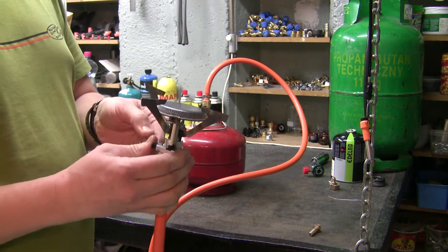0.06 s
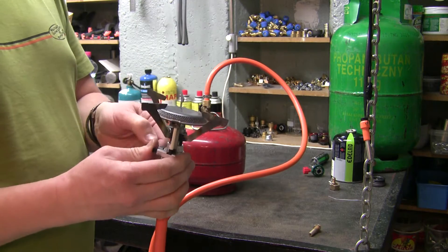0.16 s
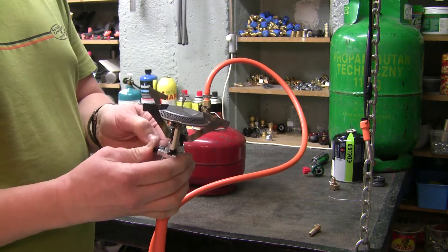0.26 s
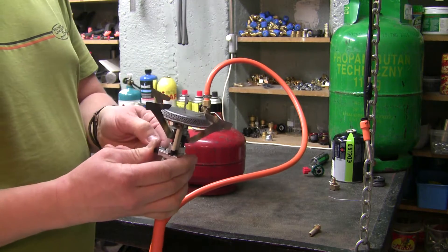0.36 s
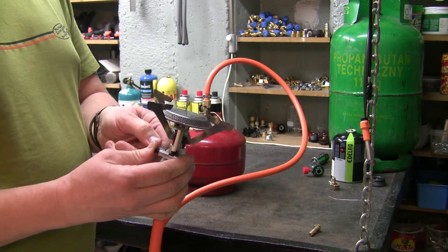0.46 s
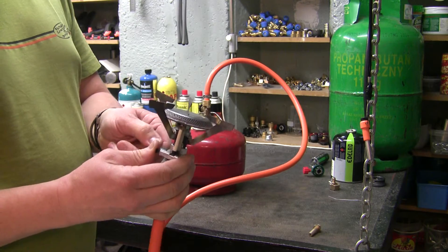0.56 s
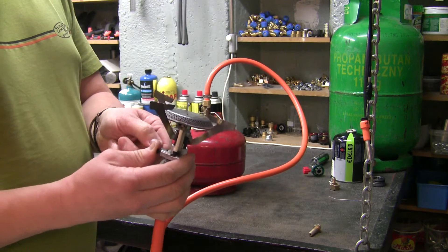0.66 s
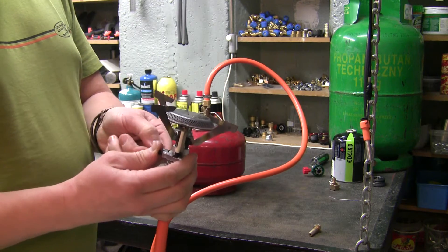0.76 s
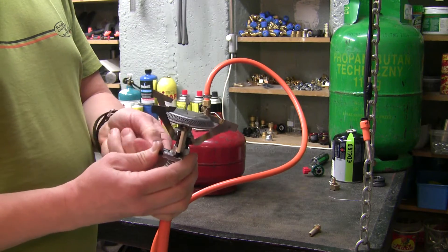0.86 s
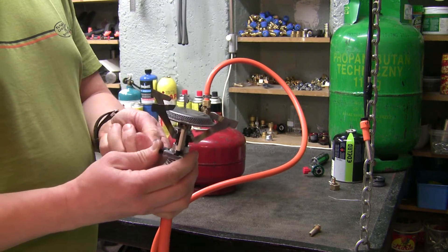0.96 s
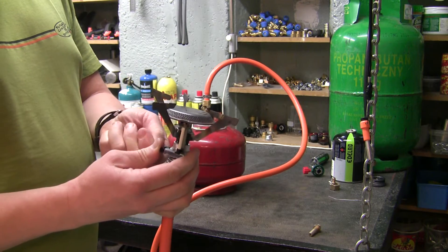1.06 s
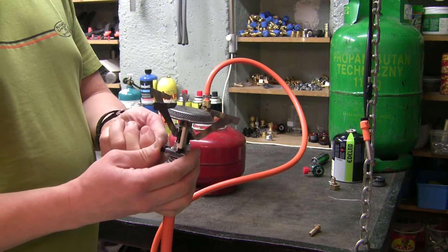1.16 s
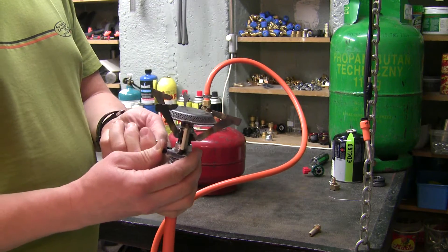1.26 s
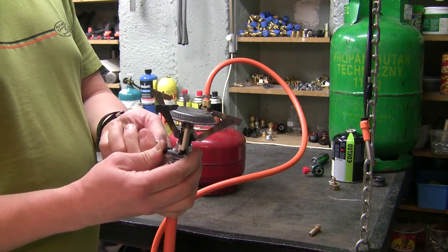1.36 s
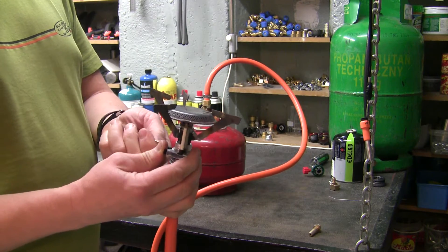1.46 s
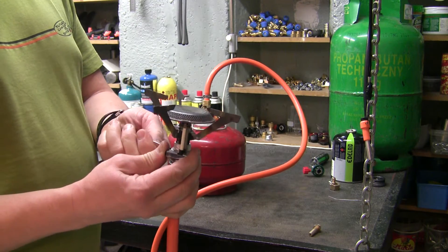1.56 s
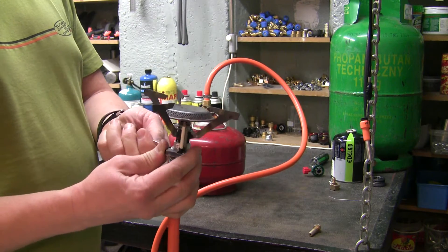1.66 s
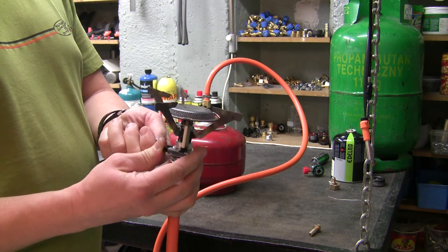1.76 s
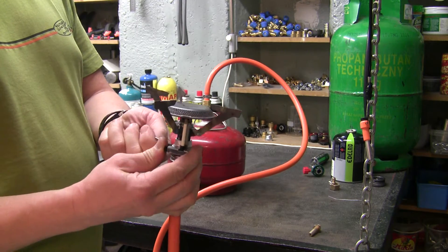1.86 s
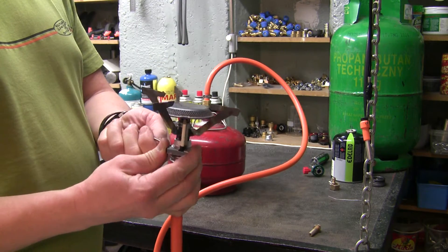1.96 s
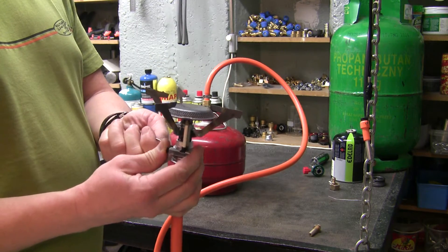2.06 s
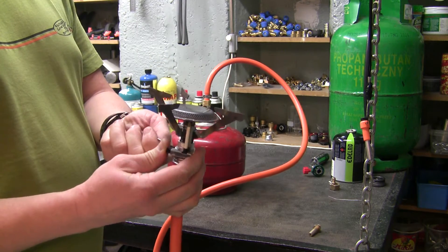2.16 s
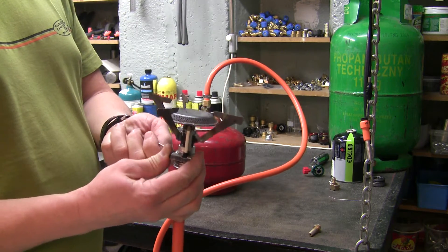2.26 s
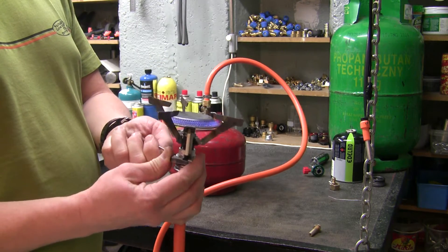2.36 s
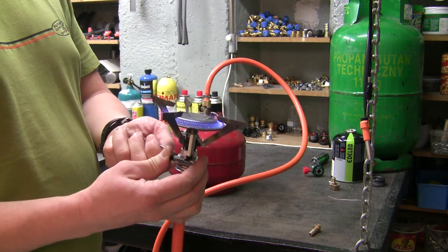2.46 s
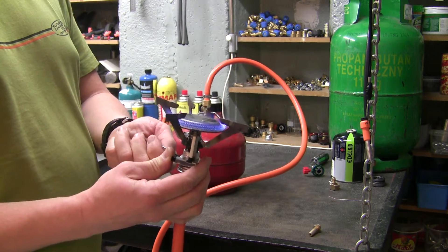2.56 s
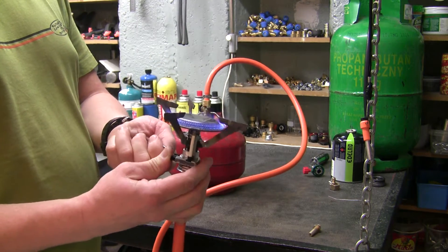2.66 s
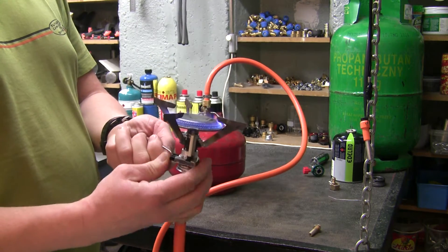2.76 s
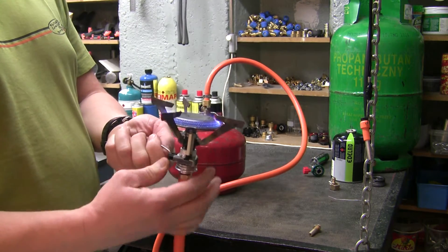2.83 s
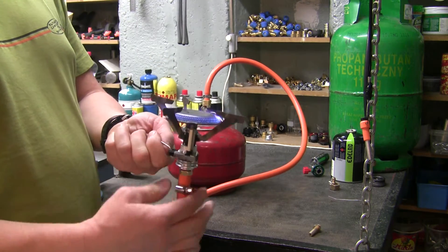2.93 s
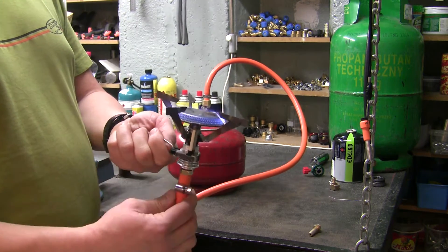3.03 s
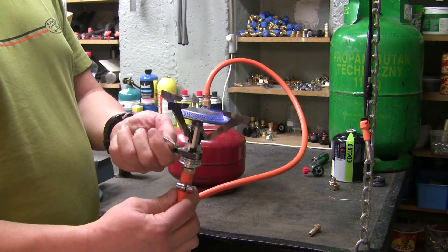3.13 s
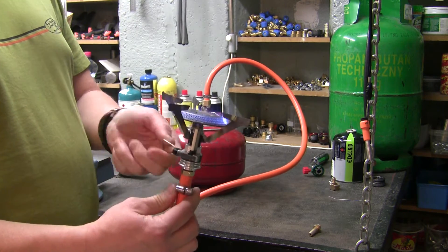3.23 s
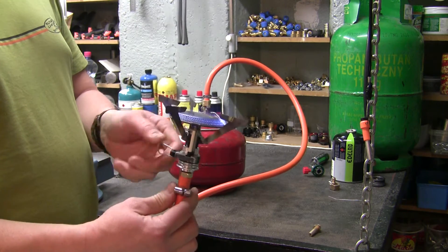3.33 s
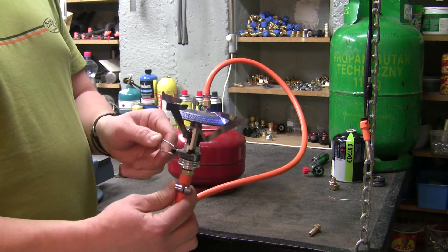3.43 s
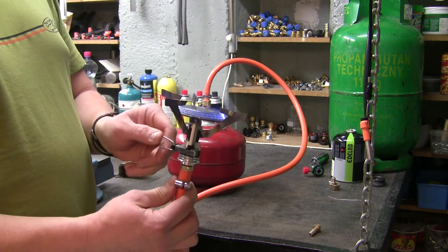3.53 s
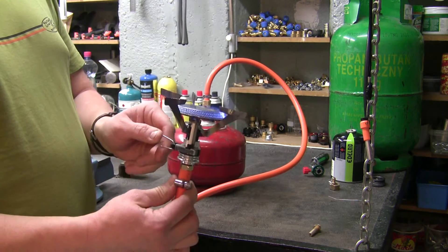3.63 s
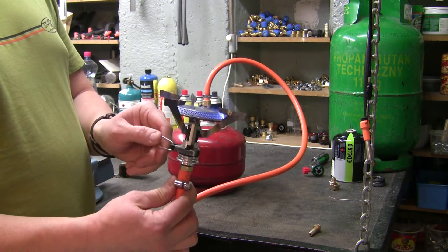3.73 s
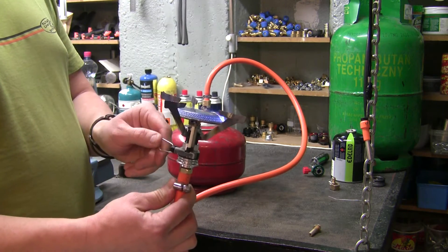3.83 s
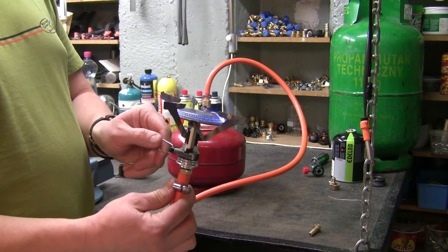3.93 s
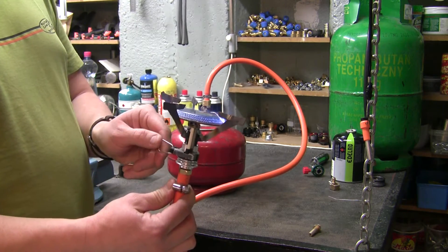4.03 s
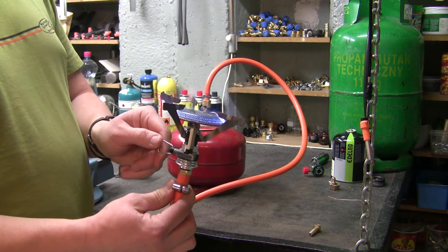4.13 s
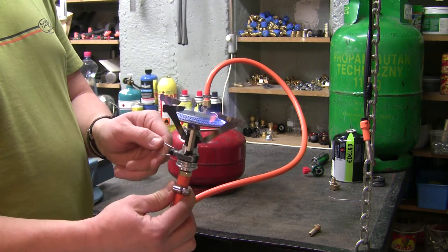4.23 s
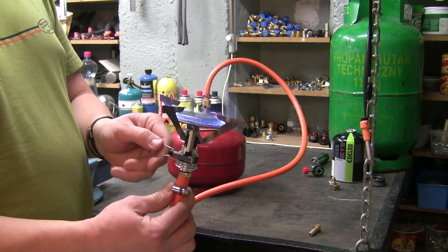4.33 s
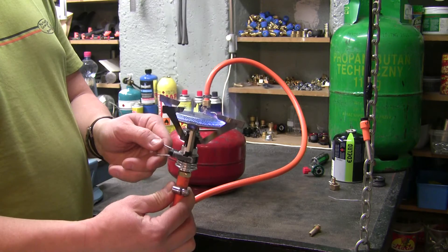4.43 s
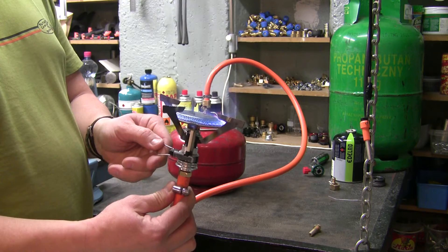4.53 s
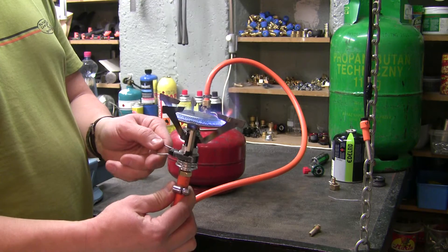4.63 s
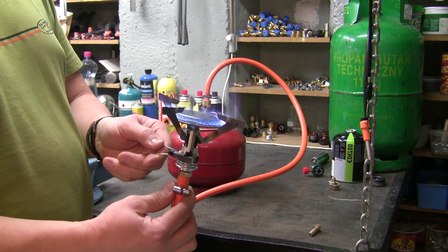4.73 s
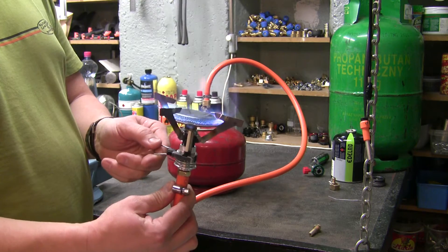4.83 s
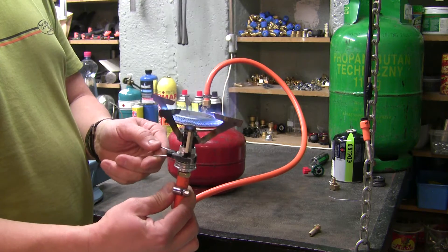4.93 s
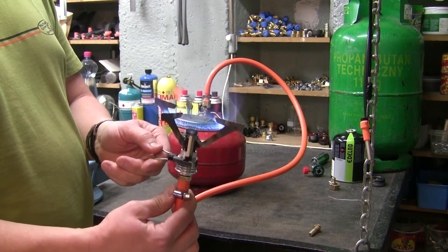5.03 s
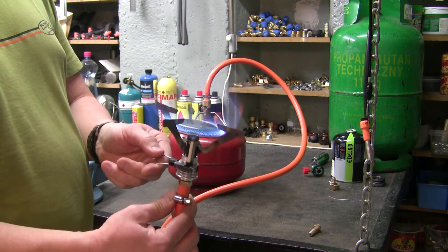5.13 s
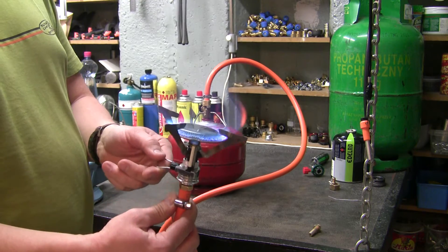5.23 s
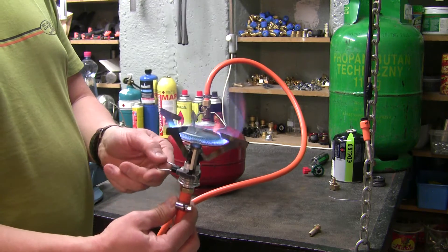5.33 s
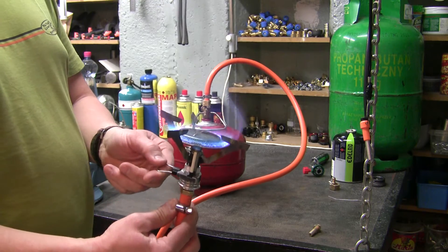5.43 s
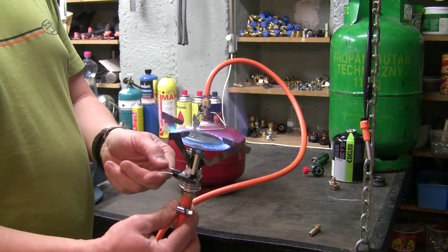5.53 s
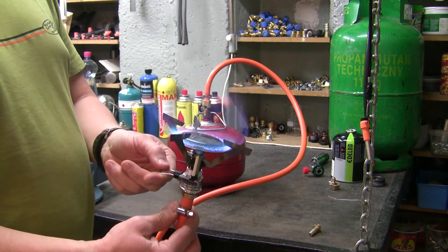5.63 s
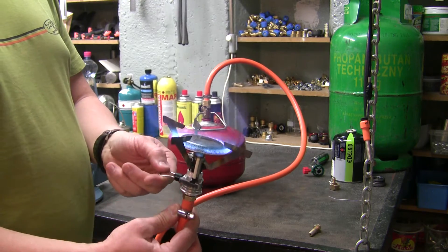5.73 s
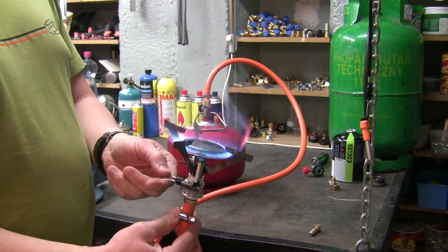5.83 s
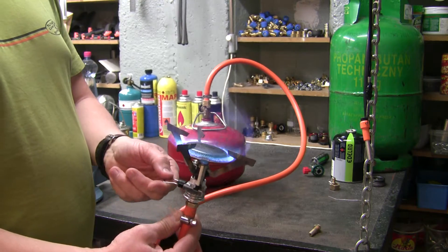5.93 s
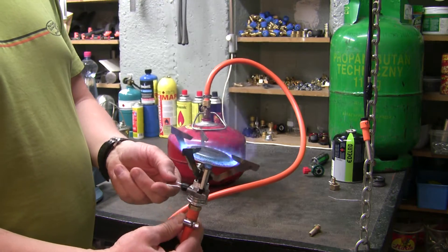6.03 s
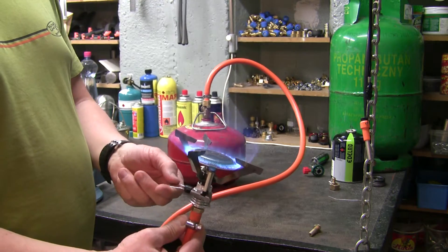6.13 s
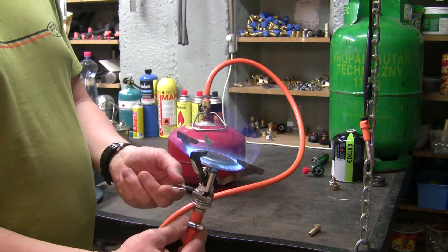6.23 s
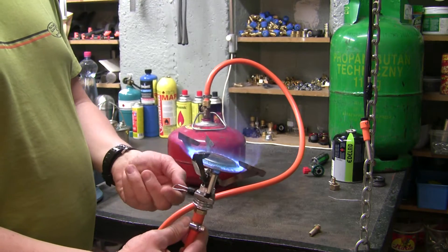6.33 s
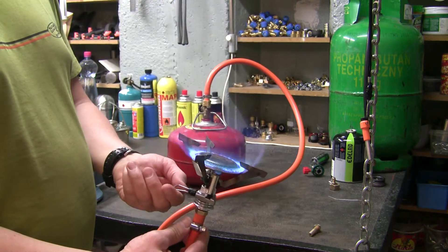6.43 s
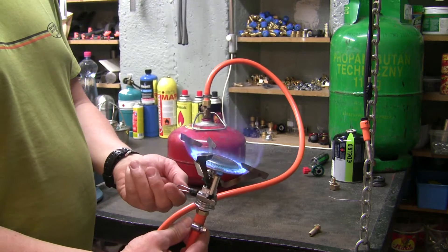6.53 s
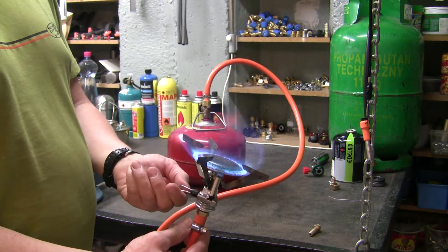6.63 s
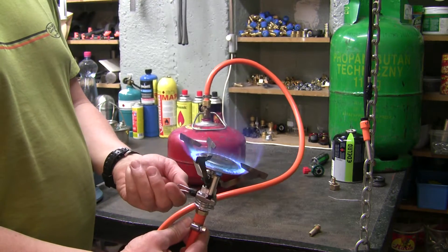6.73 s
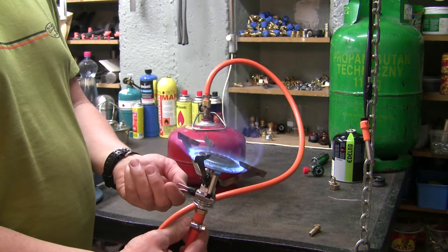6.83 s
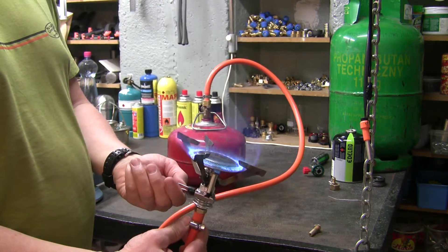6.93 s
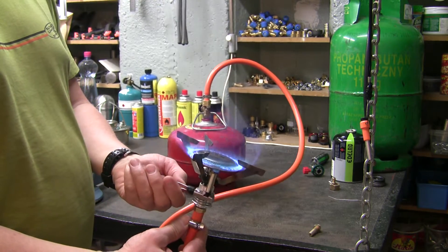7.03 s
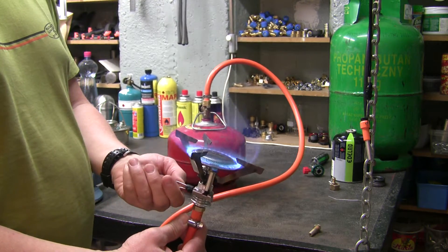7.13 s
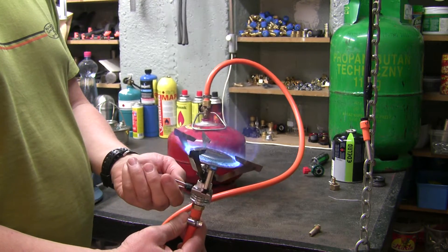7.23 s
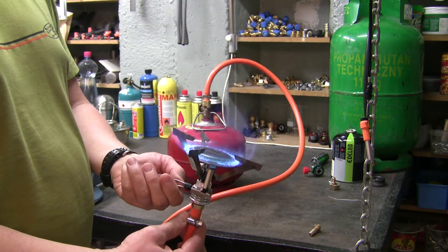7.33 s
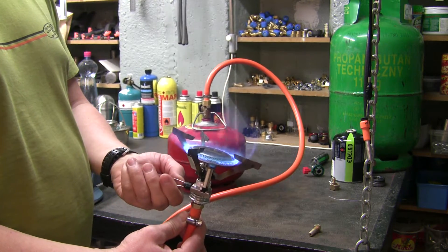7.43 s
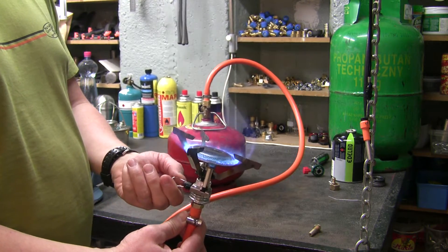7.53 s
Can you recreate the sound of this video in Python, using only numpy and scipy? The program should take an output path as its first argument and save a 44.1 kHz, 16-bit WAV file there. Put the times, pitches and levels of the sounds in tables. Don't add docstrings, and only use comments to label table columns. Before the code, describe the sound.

Close in a hard workshop room, a hand taps the valve wire of a small gas burner and a thin hiss begins. Three very loud, dry igniter snaps follow with tiny mechanical ticks around them. On the third the flame catches as a soft low roar, then the valve opens further and hiss and roar swell to a strong steady blow. One microphone, faint room rumble.

```python
import sys
import numpy as np
from scipy import signal
from scipy.fft import rfft, irfft, next_fast_len
from scipy.io import wavfile
from scipy.ndimage import uniform_filter1d

SR = 44100
rng = np.random.default_rng(int(sys.argv[2]) if len(sys.argv) > 2 else 0)


def natural_amplitude(level_db):
    exponent = np.asarray(level_db, float) / 20
    return 10 ** exponent


def master_out(mix):
    frames = np.transpose(np.atleast_2d(mix))
    ceiling = np.clip(frames, -1, 1)
    pcm = np.round(ceiling * 32767).astype(np.int16)
    wavfile.write(sys.argv[1], SR, pcm)


N = 334542

LIGHT_S = 2.305
SIMMER_DB = -40


def evened(x):
    return x / np.sqrt(np.mean(x ** 2) + 1e-20)


def read(points, hz):
    f, value = np.transpose(points)
    return np.interp(np.log(hz + 1), np.log(f + 1), value)


def frame_axes(size):
    return np.arange(4 * N // size + 6) * size / 4 / SR, np.fft.rfftfreq(size, 1 / SR)[:, None]


def bump(hz, centre_hz, width_hz):
    return 1 / (1 + (2 * (hz - centre_hz) / width_hz) ** 2)


def step(u):
    return .5 + .5 * np.tanh(u / 2)


def noise(gain, patchy_db, size):
    a, b, patch = rng.standard_normal(gain.shape[::-1] + (3,)).T
    patch = uniform_filter1d(patch, size=size // 100, axis=0)
    patch = evened(uniform_filter1d(patch, size=8192 // size + 2, axis=1))
    gain = gain * (frame_axes(size)[1] < 15760)
    gain = gain / np.sqrt((gain ** 2).mean(0)) * natural_amplitude(patchy_db * patch)
    x = signal.istft(gain * (a + 1j * b), nperseg=size, noverlap=3 * size // 4)[1]
    return evened(x[:N])


def wobble(hz):
    low_pass = signal.butter(2, hz, fs=SR, output="sos")
    return evened(signal.sosfilt(low_pass, rng.standard_normal(N)))


# start_s [s], level_db [dB]
VALVE_OPENING = [(.93, -75), (1.0, -64), (1.06, -52), (1.14, -52), (1.2, -42.5), (1.5, -42), (1.7, -44),
                 (1.85, -39.5), (2.3, -37.5), (2.76, -41), (3.85, -40.5), (4.3, -30.5), (4.9, -24.5),
                 (5.7, -21.5), (7.59, -22)]


def valve(t):
    return np.interp(t, *np.transpose(VALVE_OPENING), left=-120)


def lit(t, decay_s):
    return np.exp(-np.maximum(t - LIGHT_S, 0) / decay_s)


def heat(t):
    return step((t - 5.8) / .4)


# pitch_hz [Hz], level_db [dB per Hz]
SLOW_JET = [(150, -21.5), (600, -20.5), (1500, -23), (2500, -19), (3800, -13.5), (6000, -17), (9000, -19.5),
            (10500, -24.5), (12500, -34), (16000, -33)]
FAST_JET = [(150, -27), (600, -11.5), (1500, -13), (2500, -9), (3800, -10.5), (5800, -13.5), (8500, -13.5),
            (10700, -14.5), (12600, -36), (16000, -35)]
# pitch_hz [Hz], width_hz [Hz], slow_db [dB], fast_db [dB]
TUBE_MODES = [(2046, 130, -24, -8.5), (2760, 300, -34, -8.5), (3200, 210, 0, -11), (3298, 146, -4, -3),
              (3530, 160, -7, -13), (4270, 240, -24, -3.5), (4550, 227, -7, -2.5), (4850, 270, -11, -3.2),
              (5250, 300, -9.5, -13.5), (7000, 600, -17, -7), (7520, 430, -16.5, -2.5),
              (8720, 330, -19, -40), (9600, 500, -33, -11), (11540, 650, -21, -15.5),
              (13700, 600, -24, -17), (14150, 550, -29, -17.5)]


def jet():
    t, hz = frame_axes(size=1024)
    burning = 1 - lit(t, decay_s=.08)
    cold_share, lit_share, share_per_db = .1, .46, .019
    drawn = lit_share - cold_share + share_per_db * (valve(t) - SIMMER_DB)
    fast = np.clip(cold_share + burning * drawn, 0, 1)
    chill = np.exp(-((valve(t) + 30.5) / 5) ** 2)
    tuning = 1 - .016 * burning * chill + .011 * heat(t)
    power = natural_amplitude((1 - fast) * read(SLOW_JET, hz) + fast * read(FAST_JET, hz)) ** 2
    for pitch_hz, width_hz, slow_db, fast_db in TUBE_MODES:
        mode_gain = natural_amplitude((1 - fast) * slow_db + fast * fast_db)
        power = power + mode_gain ** 2 * bump(hz, pitch_hz * tuning, width_hz) ** 2
    hiss = noise(np.sqrt(power), patchy_db=1.2, size=1024)
    return hiss * natural_amplitude(valve(np.arange(N) / SR) + 1.1 + 0.32 * wobble(hz=40))


# pitch_hz [Hz], level_db [dB per Hz]
GENTLE_FLAME = [(30, -62), (60, -26), (90, -17), (120, -5), (250, -3.5), (450, -13.5), (750, -23.5),
                (1100, -25), (1400, -34.5), (3000, -49)]
FIERCE_FLAME = [(30, -55), (60, -32), (90, -21.5), (120, -8.5), (200, -7.5), (300, -5), (450, -7),
                (780, -16.5), (1050, -12.5), (1450, -23), (3000, -38)]


def flame():
    t, hz = frame_axes(size=4096)
    fierce = -.05 + .7 * step((valve(t) + 32.5) / 1.3) + .011 * (valve(t) - SIMMER_DB)
    fierce = np.clip(fierce - .6 * lit(t, decay_s=.08) + .12 * heat(t), -1, 1)
    gain = natural_amplitude((1 - fierce) * read(GENTLE_FLAME, hz) + fierce * read(FIERCE_FLAME, hz))
    t = np.arange(N) / SR
    warming_db = 7 * (1 - lit(t, decay_s=1.3))
    opening_db = .22 * (valve(t) - SIMMER_DB)
    catching_db = -26 * lit(t, decay_s=.028)
    roar_db = -30.5 + warming_db + opening_db + catching_db
    roar = noise(gain, patchy_db=0.34, size=4096) * (t > LIGHT_S)
    return roar * natural_amplitude(roar_db - 0.78 + 0.56 * wobble(hz=25))


# pitch_hz [Hz], t60_s [s]
BAND_DECAY = [(300, 0.3), (2000, 0.24), (6000, 0.18), (12000, 0.15)]


def burst(colour, t60, rise):
    t, hz = np.arange(400) * 32 / SR, np.fft.rfftfreq(128, 1 / SR)[:, None]
    a, b = rng.standard_normal((2, len(hz), len(t)))
    z = (a + 1j * b) * natural_amplitude(read(colour, hz) - 60 * t / (t60 * read(BAND_DECAY, hz)))
    x = signal.istft(z, nperseg=128, noverlap=96)[1][:12000]
    return x / np.sqrt(np.mean(x[:64] ** 2)) * (1 - np.exp(-np.arange(12000) / SR / rise))


def rings(modes, flutter_db=0):
    t = np.arange(12000) / SR
    out = 0
    for f, db, t60 in modes:
        flutter = evened(uniform_filter1d(rng.standard_normal(len(t)), size=200))
        envelope = natural_amplitude(db - 60 * t / min(t60, .22) + flutter_db * flutter)
        out = out + envelope * np.sin(2 * np.pi * (f * t + rng.random()))
    return out * (1 - np.exp(-t / 0.00008))


def add(mix, start_s, sound):
    part = mix[round(start_s * SR):][:len(sound)]
    part += sound[:len(part)]


# start_s [s], level_db [dB peak]
SNAPS = [
    (1.5423, -0.5),
    (1.9413, -0.5),
    (2.2966, -0.5),
]
# pitch_hz [Hz], level_db [dB per Hz]
SNAP_COLOUR = [(100, -46), (600, -31), (1540, -21.5), (3200, -7), (4880, -20), (5920, -12), (7810, -0.5),
               (9470, -7), (12800, -6), (15500, -11), (17000, -36)]
SNAP_TAIL = [(100, -17), (300, -27), (1200, -32), (2000, -17.5), (3250, -11.5), (5550, -4.5), (6580, -7),
             (10500, -10), (15300, -14), (16000, -45)]
# pitch_hz [Hz], level_db [dB], t60_s [s]
IGNITER_MODES = [(3270, -1, 0.035), (5700, -7, 0.1), (6470, 0, .1), (8350, -11, .09), (9300, -25, .15),
                 (11500, -7, 0.11), (13530, -20, .1)]
# delay_s [s], level_db [dB]
BOUNCES = [
    (.0092, -17),
    (.0168, -16),
]


def snaps():
    out = np.zeros(N)
    for start_s, level_db in SNAPS:
        crack = natural_amplitude(0.5) * rings([(7780, 2.5, 0.0033), (1310, -25, 0.004), (5100, -8.5, 0.0047),
                                  (12200, -6, 0.0046), (14900, -14, 0.0088)])
        rattle = natural_amplitude(-9.5) * burst(SNAP_COLOUR, t60=.1, rise=.0008)
        tail = natural_amplitude(-20) * burst(SNAP_TAIL, t60=1.14, rise=0.0028)
        metal = natural_amplitude(-27.5) * rings(IGNITER_MODES, flutter_db=6.5)
        add(out, start_s, natural_amplitude(level_db) * (crack + rattle + tail + metal))
        for delay_s, bounce_db in BOUNCES:
            add(out, start_s + delay_s, natural_amplitude(level_db + bounce_db) * (crack + rattle))
    return out


# start_s [s], level_db [dB peak], pitch_hz [Hz], t60_s [s], tail_db [dB]
TICKS = [
    (.721, -53, 3200, .015, -20),
    (1.508, -35, 7000, .02, -8),
    (1.711, -35, 6400, .02, -9),
    (1.776, -29, 6790, 0.014, -8),
    (2.148, -24.5, 6900, .015, -14),
    (2.4978, -24, 6660, 0.013, -8),
]
# pitch_hz [Hz], level_db [dB per Hz]
TICK_COLOUR = [(500, -40), (2500, -15), (4500, -8), (6800, -4), (8200, -9), (11000, -16), (15000, -18),
               (16000, -45)]


def ticks():
    out = np.zeros(N)
    for start_s, level_db, pitch_hz, t60_s, tail_db in TICKS:
        tail = natural_amplitude(tail_db) * burst(TICK_COLOUR, t60=0.37, rise=.0003)
        add(out, start_s, natural_amplitude(level_db) * (rings([(pitch_hz, 0, t60_s)]) + tail))
    return out


# start_s [s], level_db [dB peak]
TAPS = [
    (.636, -28.3),
]
# pitch_hz [Hz], level_db [dB], t60_s [s]
WIRE_MODES = [(1980, 0, .07), (2200, -8, .14), (4100, -10, .15), (5560, -6, .14), (5680, -8, .1),
              (6270, -11, .2), (6525, -5, .16), (6900, -1, .12), (7080, -6, .3), (7250, -1, .13),
              (8050, -12, .1)]
# pitch_hz [Hz], level_db [dB per Hz]
TAP_COLOUR = [(300, -23), (800, -21), (1400, -20), (1950, -9), (2850, -25), (3800, -15), (5600, -18),
              (7010, -4), (8000, -18), (9500, -20), (11000, -35), (16000, -40)]


def taps():
    out = np.zeros(N)
    for start_s, level_db in TAPS:
        knock = natural_amplitude(-7.5) * burst(TAP_COLOUR, t60=.15, rise=.0003)
        tail = natural_amplitude(-15) * burst(TAP_COLOUR, t60=.95, rise=.002)
        wire = natural_amplitude(-17) * rings(WIRE_MODES, flutter_db=4.0)
        add(out, start_s, natural_amplitude(level_db) * (knock + tail + wire))
    return out


def walls(x, wet_db, t60):
    at = np.arange(200, 12000, 22)
    echoes = np.zeros(12100)
    signs = rng.choice([-1., 1.], len(at))
    echoes[at + rng.integers(0, 22, len(at))] = signs * natural_amplitude(-60 * at / SR / t60)
    echoes *= natural_amplitude(wet_db) / np.linalg.norm(echoes)
    echoes[0] = 1
    return signal.fftconvolve(x, echoes / np.linalg.norm(echoes))[:N]


# pitch_hz [Hz], width_hz [Hz], level_db [dB lift]
SHOP_MODES = [(136, 11, 0.5), (185.5, 14, 3), (190.2, 10, -3.5), (197.5, 11, 5), (233, 17, -3),
              (264.8, 19.3, 8.5), (308, 16, -12), (366.4, 17.3, 7.5), (395, 31, -6.5), (446.6, 20, 4),
              (567, 7.7, -1.5), (640, 25, -7.5), (672, 19, 8), (719, 26, -5), (810, 26, -5), (892, 40, 4),
              (978, 36, 3), (1150, 37, -3.5), (1216, 31, 6.5), (1627, 120, 5)]


def standing(x):
    size = next_fast_len(N + SR // 2)
    hz = np.fft.rfftfreq(size, 1 / SR)
    lift_db = sum(db * bump(hz, f, w) for f, w, db in SHOP_MODES)
    return irfft(rfft(x, size) * natural_amplitude(lift_db), size)[:N]


# pitch_hz [Hz], level_db [dB per Hz]
RUMBLE = [(20, -7.5), (40, -17), (65, -8), (90, -17), (150, -9), (250, -17), (500, -17.5), (800, -23.5),
          (1500, -26), (3000, -29), (15500, -30)]
# pitch_hz [Hz], level_db [dB rms]
HUM = [(30, -77), (60, -69), (118, -73.5)]


def floor():
    t, hz = frame_axes(size=2048)
    hum = 0
    for pitch_hz, level_db in HUM:
        cycles = pitch_hz * np.arange(N) / SR + rng.random()
        hum = hum + natural_amplitude(level_db + 2) * np.sin(2 * np.pi * cycles)
    return natural_amplitude(-61.5) * noise(natural_amplitude(read(RUMBLE, hz)) + 0 * t, patchy_db=0.5, size=2048) + hum


def scene():
    steady = walls(jet(), wet_db=-8, t60=.22) + walls(flame(), wet_db=-15, t60=.25)
    mono = standing(steady) + snaps() + ticks() + taps() + floor()
    return np.array([mono, mono])


# pitch_hz [Hz], level_db [dB per Hz]
AMP_HISS = [(20, 13), (100, 11), (400, 6.1), (1000, 1), (4000, 0.23), (15500, 0.36)]


def amplifier_hiss():
    t, hz = frame_axes(size=1024)
    return natural_amplitude(-61.5) * noise(natural_amplitude(read(AMP_HISS, hz)) + 0 * t, patchy_db=1.5, size=1024)


def top_cut(x):
    return signal.sosfilt(signal.butter(12, 16810, fs=SR, output="sos"), x)


def record(dry):
    hiss = [amplifier_hiss() for _ in dry]
    band = signal.firwin(255, 16300, window=("kaiser", 8), fs=SR)[None]
    mix = signal.oaconvolve(np.clip(dry, -.99, .99), band, "same") + hiss
    return top_cut(mix)


dry = scene()
out = record(dry)
master_out(out)
```